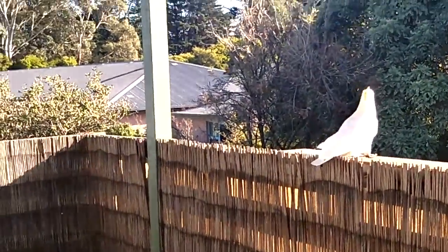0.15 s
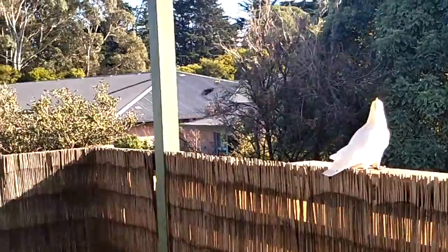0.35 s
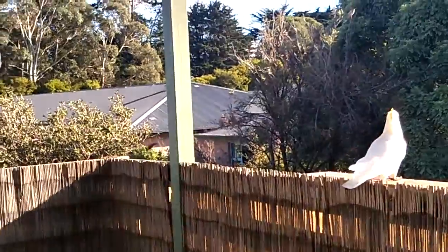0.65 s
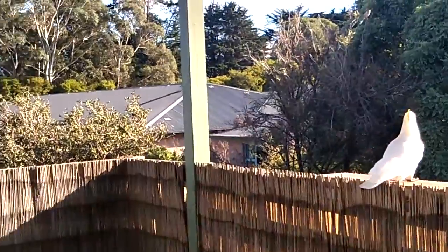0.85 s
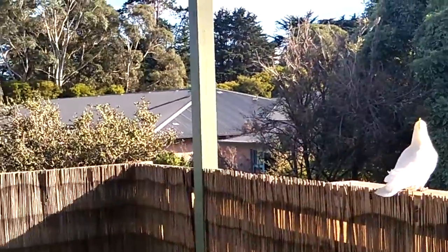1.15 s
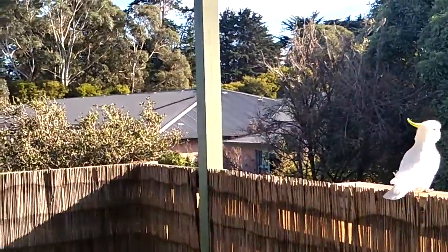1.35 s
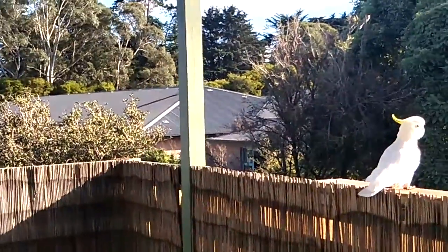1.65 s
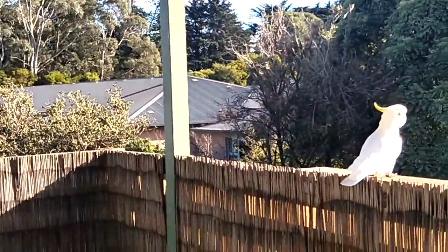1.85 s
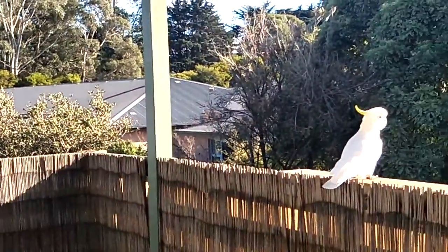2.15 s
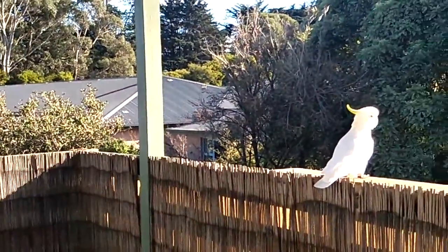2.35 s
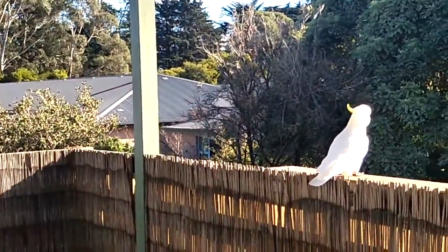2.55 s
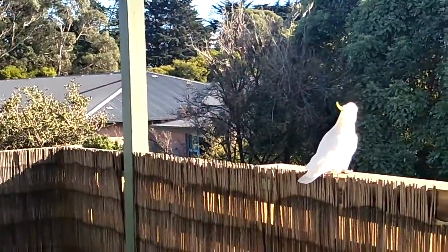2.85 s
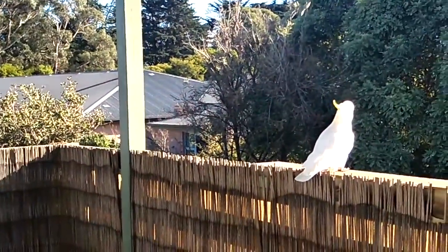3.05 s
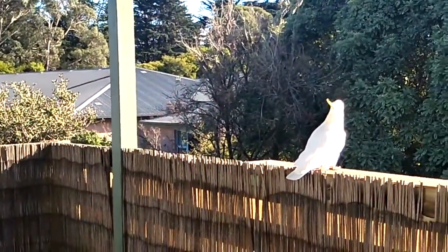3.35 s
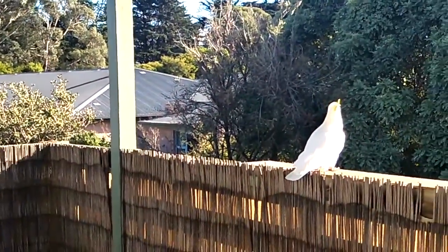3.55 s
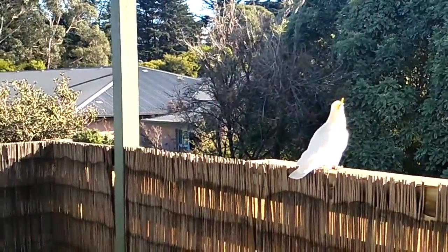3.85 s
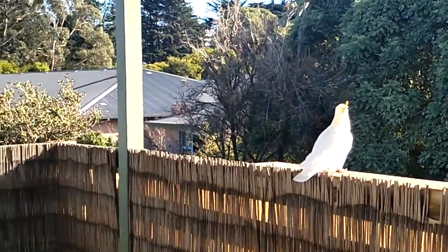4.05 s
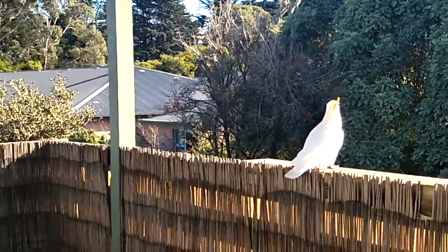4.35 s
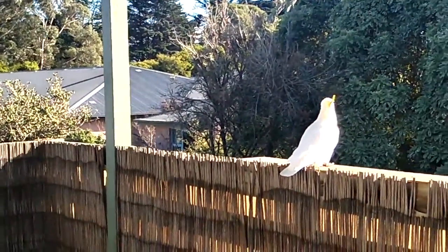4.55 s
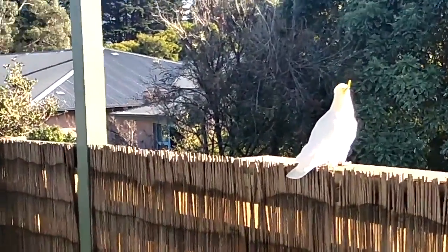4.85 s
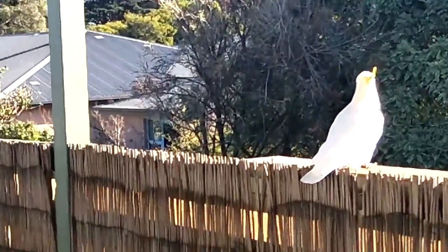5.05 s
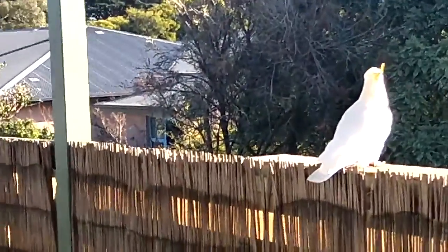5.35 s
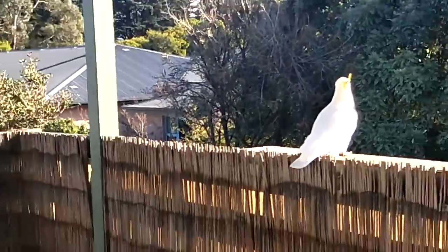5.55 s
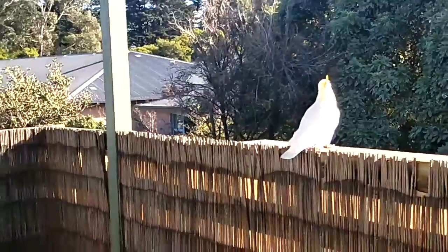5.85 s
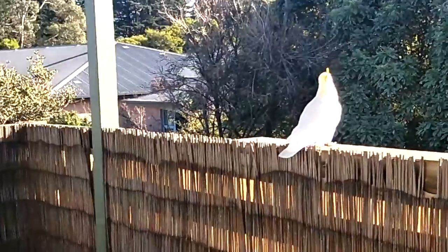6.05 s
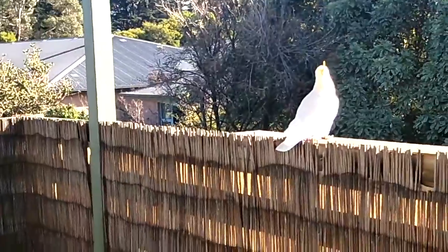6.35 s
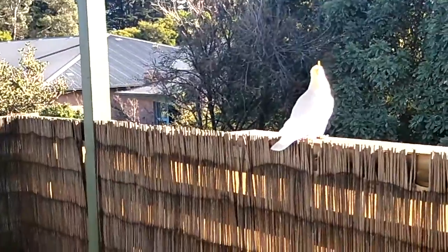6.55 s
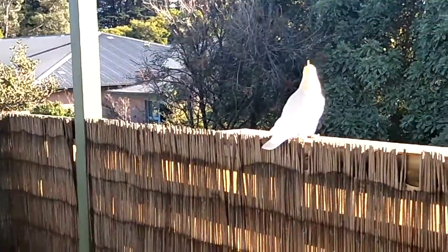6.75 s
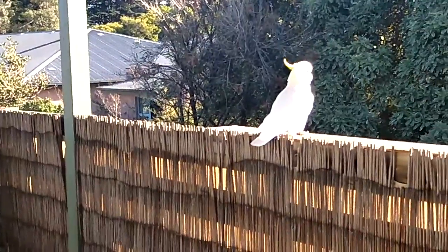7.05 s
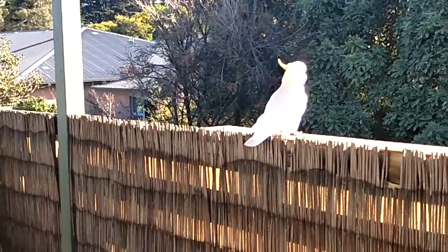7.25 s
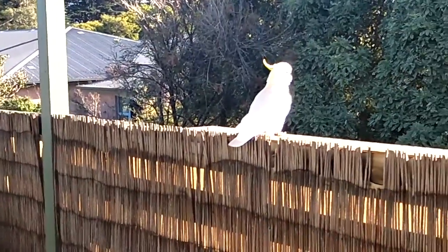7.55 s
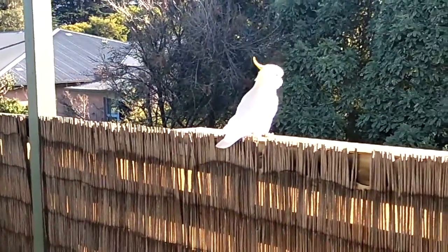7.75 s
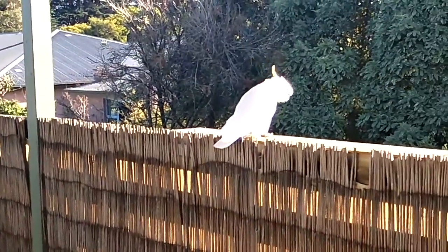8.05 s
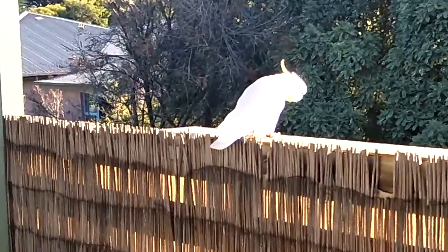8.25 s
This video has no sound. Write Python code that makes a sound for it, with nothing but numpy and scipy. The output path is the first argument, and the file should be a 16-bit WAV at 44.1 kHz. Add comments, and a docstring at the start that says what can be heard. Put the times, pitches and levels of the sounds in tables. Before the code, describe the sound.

Wingbeats and gusts of air thump close by as a cockatoo flies off screeching, leaving faint bird whistles in a suburban yard.

```python
"""A parrot flaps off past a hand-held microphone pair in a backyard, over the hush of the suburb.
Its feathers clap and its turbulent draught buffets both ports. It screeches again and again through
three throat resonances, calmer with distance, and fences and roofs reflect the calls. A few low hoots
sound far off; then distant parrots answer with thin whistles, joined by a higher, piping bird."""
import sys
import numpy as np
from scipy import signal
from scipy.fft import rfft, irfft
from scipy.io import wavfile
from scipy.ndimage import uniform_filter1d

SR = 44100
rng = np.random.default_rng(int(sys.argv[2]) if len(sys.argv) > 2 else 0)


def materialize(psi):
    """Save the field psi as 16-bit PCM at rate SR to the path in sys.argv[1].

    A 1-D psi becomes a single channel; in a 2-D psi each row is a channel.
    """
    bounded = np.clip(np.atleast_2d(psi).T, -1, 1)
    quanta = np.round(bounded * 32767).astype(np.int16)
    wavfile.write(sys.argv[1], SR, quanta)


N = 370440


def gain_of(db):
    """Decibels to amplitude."""
    return 10 ** (np.asarray(db) / 20)


def evened(x):
    """Normalisation to rms 1."""
    return x / np.sqrt(np.mean(x ** 2) + 1e-20)


def read(points, hz):
    """Interpolation on a log-frequency axis."""
    f, value = np.transpose(points)
    return np.interp(np.log(hz + 1), np.log(f + 1), value)


def add(mix, start_s, sound):
    """Superposition of a sound on the mix."""
    part = mix[..., max(round(start_s * SR), 0):][..., :sound.shape[-1]]
    part += sound[..., :part.shape[-1]]


def coloured(points, size, tilt_db=0.):
    """Spectrally shaped noise of rms 1, tilted by tilt_db per octave about 5 kHz."""
    hz = np.fft.rfftfreq(size, 1 / SR)
    shape = gain_of(read(points, hz) + tilt_db * np.log2((hz + 1) / 5000))
    return evened(irfft(rfft(rng.standard_normal(size)) * shape, size))


def wobble(size, hz):
    """Random modulation of rms 1 that changes about hz times a second."""
    span = max(round(SR / hz / 2), 1)
    return evened(uniform_filter1d(uniform_filter1d(rng.standard_normal(size), span), span))


def resonate(x, hz, width_hz):
    """A moving resonance by heterodyning: shift hz down to zero, smooth twice, shift back."""
    turn, r = np.exp(2j * np.pi * np.cumsum(hz) / SR), np.exp(-np.pi * width_hz / SR)
    low = signal.lfilter([1 - r], [1, -r], signal.lfilter([1 - r], [1, -r], x / turn))
    return 2 * (turn * low).real


def jittered_phase(hz, depth, rate_hz):
    """Phase as the integral of a randomly modulated frequency."""
    return 2 * np.pi * np.cumsum(hz * (1 + depth * wobble(len(hz), rate_hz))) / SR


def panned(x, pan_db):
    """Level difference between the ports: pan_db is left minus right."""
    return x * gain_of([[pan_db / 2], [-pan_db / 2]])


def contour(length_s, first_hz, peak_hz, last_hz, peak):
    """Progress 0-1 and pitch of a note that bends at its peak."""
    share = np.linspace(0, 1, round(length_s * SR))
    return share, np.interp(share, [0, np.clip(peak, .02, .98), 1], [first_hz, peak_hz, last_hz])


def arch(share, peak, start_db=-17, end_db=-14):
    """Parabolic swell and decay of a note, in dB."""
    from_peak = np.interp(share, [0, np.clip(peak, .02, .98), 1], [-1, 0, 1])
    return from_peak ** 2 * np.where(share < peak, start_db, end_db)


def eddy(edge_db, period_ms):
    """A passing vortex: a pressure pulse between two suctions, its front breaking into ripples."""
    t = np.arange(-1500, 1500) / SR

    def pulse(hz, lead_s=0):
        square = (np.pi * hz * (t + lead_s)) ** 2
        return (1 - 2 * square) * np.exp(-square)

    hz, spread = 1000 / period_ms, 1.1 ** rng.standard_normal()
    body = pulse(hz) + .13 * pulse(55 * spread)
    edge = pulse(2.67 * hz * spread, .003) + .12 * pulse(300 * spread, -.0011)
    return np.hanning(len(t)) * (body + gain_of(edge_db + 1) * edge)


def draught(small_eddies=70):
    """Turbulence: low pressure fluctuations, uncorrelated at the ports, with single eddies on top."""
    # strength of the flow: time_s, left_db, right_db, extra_flutter_db
    flow = [(0, -45, -45, 3), (.07, -34, -54, 6.5), (.14, -27.5, -28.5, -3), (.21, -28.5, -35, 7),
            (.28, -24.5, -41, 1.5), (.35, -19, -34, -6), (.42, -21, -27.5, 0.5), (.49, -28, -34.5, -5),
            (.58, -40.5, -39.5, -6.5), (.7, -19.5, -28, -6), (.77, -34, -41.5, 6), (.84, -46, -36, -5),
            (.91, -25.5, -34.5, 4), (1.05, -39, -41.5, 7), (1.12, -31.5, -49, 9.5), (1.19, -29.5, -43, 2),
            (1.33, -40.5, -52, -10.5), (1.47, -52.5, -83, -6.5), (1.539, -32, -52, 3),
            (1.61, -47, -42, -13), (1.68, -50, -46.5, -8), (1.82, -66.5, -65.5, -1), (1.96, -71.5, -75, -5),
            (2.1, -76, -52, -18), (2.24, -77.5, -71.5, -10.5), (2.45, -87, -83, -1.5)]
    # big eddies: time_s, level_db, side (1 left, -1 right), relative_edge_db, period_ms
    eddies = [(.049, -17.5, 1, -42, 5.8), (.088, -16.5, -1, -26, 5.5), (.142, -10, -1, -20.5, 5.9),
              (.16, -10, 1, -9, 7.2), (.214, -21.5, 1, -21, 9.6), (.251, -15.5, -1, -38, 21),
              (.268, -23, -1, -28, 5.7), (.326, -10.5, 1, -14, 10.7), (.362, -13, -1, -26.5, 5.6),
              (.4, -19.5, 1, -12, 7.6), (.419, -10.5, 1, -30, 17), (.461, -20, 1, -8, 9),
              (.513, -18, -1, -36, 11.6), (.621, -17.5, 1, -9, 7.5), (.707, -8.5, 1, -5.5, 6.56),
              (.737, -18.5, 1, -14, 8.7), (.801, -11.5, -1, -25.5, 6.3), (.931, -15, 1, -2, 8),
              (.955, -14, 1, -14.5, 4.5), (1.028, -27, 1, -4, 8.6), (1.041, -24.5, 1, 1, 7.9),
              (1.093, -14.5, 1, 0.5, 7.34), (1.15, -28, 1, -26, 6.6), (1.164, -21, 1, -15.5, 6.7),
              (1.219, -36, 1, -5, 6.2), (1.237, -17.5, 1, -11.5, 14.8), (1.514, -24.5, 1, -12, 7)]
    # spectrum of the slow turbulence: frequency_hz, density_db
    rumble_spectrum = [(8, -5.5), (20, -3.5), (38, 1.5), (70, -5), (110, -9.5), (170, -25.5), (400, -78.5)]
    # spectrum of the fast turbulence: frequency_hz, density_db
    flutter_spectrum = [(40, -49.5), (70, -27), (120, 3.5), (250, -6.5), (450, -20), (800, -38.5),
                        (1600, -94)]
    times, *strength_db, extra_db = np.transpose(flow)
    size, out = round(times[-1] * SR), np.zeros((2, N))
    t = np.arange(size) / SR
    for port in range(2):
        db = np.interp(t, times, strength_db[port])
        flutter_db = db + np.interp(t, times, extra_db) - 11.5
        rumble = coloured(rumble_spectrum, size) * gain_of(db + 3.5 + .61 * wobble(size, 31))
        flutter = coloured(flutter_spectrum, size) * gain_of(flutter_db + 5.1 * wobble(size, 40))
        add(out[port], 0, rumble + flutter)
    small = []
    for k, s in enumerate(rng.uniform(.04, times[-1] - .1, small_eddies)):
        db = np.interp(s, times, strength_db[k % 2]) - 1
        small.append((s, db, (-1) ** k, -19, 9 * 1.5 ** rng.standard_normal()))
    for s, db, side, edge_db, period_ms in eddies + small:
        burst = gain_of(db) * eddy(edge_db, period_ms)
        add(out[int(side < 0)], s - len(burst) / 2 / SR, burst)
    return out


def formant(hz, width_hz):
    """One throat resonance: band-limited noise and an unsteady tone that swell together."""
    size = len(hz)
    air = evened(resonate(resonate(rng.standard_normal(size), hz, width_hz), hz, 2 * width_hz))
    phase = jittered_phase(hz, depth=.026, rate_hz=45)
    tone = .88 * gain_of(3.6 * wobble(size, 60)) * np.sin(phase)
    return (air + tone) * gain_of(4 * wobble(size, 27))


def screeches(near_until_s=2.4, far_width=.62):
    """Source and filter: a broken, throbbing voice on three formants that shift together."""
    # calls: start_s, rise_s, hold_s, fall_s, effort_db, middle_formant_hz, climb_share,
    # low_formant_db, high_formant_db, rasp_db, breath_re_high_db, pan_db
    calls = [(0, 0.0027, .04, .05, -57.5, 4200, 0.016, -17, 0, -13.5, 6, -1.5),
             (0.397, .035, .05, 0.067, -37.5, 3927, 0.056, -7.5, 3.5, -18.5, -8.5, -3),
             (0.838, 0.017, 0.062, 0.075, -41.5, 3888, .03, -5.5, 4.5, -25, -9.5, -3.5),
             (1.415, 0.049, 0.034, 0.054, -34.5, 3980, 0.051, -6, 4, -21, -6.5, -0.5),
             (1.816, 0.032, 0.067, 0.051, -36.5, 3970, 0.059, -6, 1, -23, -9.5, -2),
             (2.139, 0.047, 0.064, 0.051, -41, 3853, .06, -6, 2, -28, -9.5, -3),
             (2.455, 0.073, .09, 0.12, -46.5, 3842, 0.031, -8, -3.5, -23, -4.5, -4),
             (2.761, .06, 0.093, 0.096, -44, 3824, .015, -6, -5, -19.5, -1.5, -3),
             (3.058, 0.058, 0.077, 0.1, -48, 3827, .03, -2.5, -5.5, -18, 0, -2),
             (3.601, 0.056, 0.061, 0.044, -51, 3650, .015, -6.5, -4, -20, 0, -4.5),
             (3.716, .05, 0.034, 0.062, -58, 3700, 0.02, -1, 6, -21, -5, -7.5),
             (3.86, 0.069, .06, 0.053, -78.5, 3910, .015, -10, 13.5, -11.5, -6.5, -13.5),
             (4.4, .02, .04, 0.041, -58, 4290, .03, -22.5, -15, -12.5, -8, -4.5),
             (4.509, 0.014, .01, 0.062, -58, 4170, 0.022, -28, -28, -8, -10, -1.5),
             (6.237, 0.049, .03, 0.025, -71, 3580, -0.02, 3, 5, -14, -11.5, -3)]
    # throat resonances at rest: centre_hz, width_hz
    throat = [(2640, 950), (3900, 1300), (5250, 1290)]
    # breath around the resonances: frequency_hz, density_db
    breath_spectrum = [(900, -35.5), (1900, -16), (2500, -13.5), (3150, -14), (3800, -11), (4450, -16.5),
                       (5000, 0.5), (6000, -4.5), (6500, -9), (7000, -63.5)]
    # treble edge of the voice: frequency_hz, density_db
    rasp_spectrum = [(6600, -60.5), (7500, -0.5), (8800, -1), (10000, -8), (12500, -18.5), (15500, -50)]
    sag_shares, out = (.07, .005, .005), np.zeros((2, N))
    for s, rise, hold, fall, db, mid_hz, climb, low_db, high_db, rasp_db, breath_db, pan_db in calls:
        t = np.arange(0, rise + hold + fall, 1 / SR)
        size, from_middle = len(t), t / t[-1] - .5
        stages_s = np.cumsum([0, rise, hold, fall])
        db += np.interp(t, stages_s, [-20, -4, -6, -21.5])
        low_db += np.interp(t, stages_s, [5, 0, -2.76, -13.5])
        high_db += np.interp(t, stages_s, [-5, 0, 4, -7])
        rasp_db += np.interp(t, stages_s, [-12, 0, 1, 4.5])
        throb = gain_of(2.5 * wobble(size, 150))
        beak_opening = 1 - .06 * np.exp(-t / .03)
        shift = mid_hz / throat[1][0] * (1 + climb * from_middle) * beak_opening
        shift *= 1 + .012 * wobble(size, 25)
        narrowing = far_width if s > near_until_s else 1  # later calls are calmer
        ports = []
        for port in range(2):  # near reflections make the two ports unlike
            low, mid, high = (formant(hz * (1 - sag * from_middle) * shift, width_hz * narrowing)
                              for (hz, width_hz), sag in zip(throat, sag_shares))
            breath = coloured(breath_spectrum, size) * gain_of(high_db + breath_db)
            rasp = coloured(rasp_spectrum, size) * gain_of(rasp_db + 3.5 * wobble(size, 220))
            ports.append(low * gain_of(low_db) + mid + high * gain_of(high_db) + breath + rasp)
        envelope = throb * gain_of(db) * signal.windows.tukey(size, .35)
        add(out, s, panned(np.array(ports) * envelope, pan_db))
    return out


def hush(level_db=-66):
    """Partial coherence: far traffic and leaves, correlated at the ports in the bass, not the treble."""
    # background noise: frequency_hz, density_db
    spectrum = [(12, -7), (25, -1.5), (45, 0.5), (90, -3.5), (200, -8), (320, -12), (580, -14.5),
                (750, -12.5), (1200, -16), (3400, -18), (7000, -18.5), (10000, -25), (13500, -23),
                (15600, -25.5)]
    # likeness of the two ports: frequency_hz, correlation
    coherence = [(60, -0.61), (180, 1), (550, 0.022), (1650, -0.14), (4970, 0.048), (15000, -0.07)]
    frames, hz = N // 256 + 5, np.fft.rfftfreq(1024, 1 / SR)
    a, b, c, d, patches = rng.standard_normal((frames, 513, 5)).T
    patches = evened(uniform_filter1d(uniform_filter1d(patches, 10, 0), 14, 1))
    correlation = np.clip(read(coherence, hz), -1, 1)[:, None]
    left = a + 1j * b
    right = correlation * left + np.sqrt(1 - correlation ** 2) * (c + 1j * d)
    bands = np.array([left, right]) * gain_of(read(spectrum, hz)[:, None] + 2.2 * patches)
    return gain_of(level_db) * evened(signal.istft(bands, nperseg=1024, noverlap=768)[1][:, :N])


def yard(x, far_db=-23, far_longer=2.5):
    """Reverberation: sparse echoes off fences and roofs, and a slower tail from further roofs and trees."""
    # decay of the near echoes: frequency_hz, t60_s
    decay = [(1000, 0.59), (2200, 0.37), (4000, 0.34), (5800, 0.38), (8000, 0.25)]
    taps = np.zeros((2, SR))
    at = np.arange(500, SR - 20, 20) + rng.integers(0, 20, (2, (SR - 501) // 20))
    np.put_along_axis(taps, at, rng.choice([-1., 1.], at.shape), 1)
    hz, t, bands = signal.stft(taps, SR, nperseg=256)
    fade_db = -60 * t / read(decay, hz)[:, None]
    fade = gain_of(fade_db) + gain_of(far_db + fade_db / far_longer)
    tail = signal.istft(bands * fade, SR, nperseg=256)[1]
    return signal.fftconvolve(x, tail / np.linalg.norm(tail[0]), axes=1)[:, :N]


def feather_claps(attack_s=.0021):
    """Impact noise: feathers snap in grainy bursts that decay exponentially."""
    # claps: start_s, level_db, t60_s, tilt_db_per_octave, pan_db
    claps = [(0.092, -29, 0.19, 1.5, -4), (0.109, -32, 0.1, -4.5, 6), (.352, -49.5, .05, 0.5, -5.5),
             (0.577, -52.5, 0.048, 5, -18.5), (0.951, -51, 0.11, 6.5, -2), (1.247, -38.5, 0.071, -2, -1),
             (7.559, -61, 0.089, -1.5, -6.5)]
    # feather noise: frequency_hz, density_db
    spectrum = [(590, -50.5), (1000, -23), (1270, -29.5), (1880, -19.5), (2160, -24.5), (2710, -19),
                (3220, -14.5), (3650, -13.5), (5340, -2.5), (6950, -18.5), (15500, -30.5)]
    out = np.zeros((2, N))
    for s, db, t60, tilt_db, pan_db in claps:
        t = np.arange(round(t60 * SR)) / SR
        grain = gain_of(2.8 * wobble(len(t), 300))
        burst = np.array([coloured(spectrum, len(t), tilt_db) for port in range(2)])
        envelope = gain_of(db - 60 * t / t60) * np.minimum(t / attack_s, 1)
        add(out, s, panned(burst * grain * envelope, pan_db))
    return out


def whistles(squabble_s=(3.3, 5.6), port_lag_s=.00045):
    """Random modulation roughens a tone of three harmonics; the lower two reach the right port first."""
    # notes, the first five leading into the near screeches: start_s, length_s, first_hz, peak_hz,
    # last_hz, level_db, peak_share, octave_db, octave_peak_share, pan_db
    notes = [(0.365, 0.041, 1865, 1952, 1883, -55.5, 0.9, -66, .85, 3),
             (0.805, 0.04, 1900, 1894, 1830, -60, 0.34, -64.5, 1, 11),
             (1.384, .03, 2010, 1960, 2030, -54, 1, -60, 0.84, 3),
             (1.787, 0.026, 1960, 1865, 1920, -50, 0.7, -53, 0.84, 5),
             (2.122, 0.031, 1940, 1890, 1870, -55, 0.5, -55.5, 0.96, 9),
             (2.68, 0.12, 3230, 3150, 3170, -62.5, 0.4, -80, .45, -13),
             (3.374, 0.023, 3370, 3550, 3460, -49, 0.6, -84, .45, -8),
             (3.397, 0.044, 3550, 3180, 3080, -49.5, 0.43, -86, .7, 8.5),
             (3.456, 0.091, 2315, 2540, 2880, -62.5, 0.16, -45, 1, 2),
             (3.544, 0.17, 2853, 2850, 3180, -54.5, 0.26, -41, 0.22, 4),
             (4.397, 0.069, 3070, 3100, 3430, -65.5, 0.06, -68.5, .15, -10.5),
             (4.465, 0.064, 3140, 3280, 2875, -57.5, 0.1, -55, 0.73, -2),
             (4.533, .045, 3030, 2960, 3090, -66, .22, -53.5, 0.27, 0),
             (5.285, 0.031, 2870, 2930, 2950, -70, 0.46, -55.5, .28, 2.5),
             (5.35, 0.036, 3160, 3000, 3000, -66, 0.55, -61.5, 0.86, 6),
             (5.406, 0.094, 3050, 3080, 3070, -64.5, 0.24, -73, .65, 6),
             (6.688, .033, 3190, 3200, 3600, -65.5, .45, -98.5, .3, -13),
             (6.711, 0.056, 2540, 2470, 2710, -69, 0.22, -69, 0.3, 6),
             (6.755, 0.13, 2258, 2220, 2260, -66.5, 0.62, -58, 0.53, 5.5),
             (6.964, 0.1, 2160, 2830, 2850, -71.5, 0.72, -53.5, 0.6, -5),
             (7.065, 0.071, 2870, 2685, 2663, -69.5, 0.37, -55.5, 0.53, -7.5),
             (7.754, .03, 1860, 2600, 2550, -72.5, 0.54, -95, .6, 5),
             (7.787, 0.017, 2460, 2456, 2430, -67, .48, -74, .48, 5),
             (7.8, 0.039, 3230, 3200, 3740, -60.5, 0.66, -97.5, .45, -14),
             (7.835, 0.066, 2570, 2490, 2640, -66.5, 0.03, -60.5, 1, 0.5),
             (7.881, 0.12, 2290, 2312, 2330, -62, 0.3, -58, 0.69, -5.5)]
    out = np.zeros((2, N))
    for s, length_s, first_hz, peak_hz, last_hz, db, peak, octave_db, octave_peak, pan_db in notes:
        share, hz = contour(length_s, first_hz, peak_hz, last_hz, peak)
        db += arch(share, peak)
        octave_db += arch(share, octave_peak, start_db=-21.5, end_db=-21.5)
        glide = abs(np.gradient(np.log(hz))) * SR / 12  # fast glides are unsteady
        squabbling = squabble_s[0] < s < squabble_s[1]  # the flock turns hoarse
        rough = .088 + np.minimum(glide, .3) + .3 * squabbling
        phase = jittered_phase(hz, depth=.035 * rough, rate_hz=150)
        port_phase = np.array([phase, phase + 2 * np.pi * hz * port_lag_s])
        third_db = octave_db - 19 - np.maximum(3 * hz - 6800, 0) / 17  # the windpipe cuts off near 7 kHz
        tone = gain_of(db) * np.sin(port_phase) + gain_of(octave_db) * np.sin(2 * port_phase)
        tone += gain_of(third_db) * np.sin(3 * phase)
        envelope = gain_of(6.9 * rough * wobble(len(hz), 76)) * signal.windows.tukey(len(hz), .25)
        add(out, s, panned(np.sqrt(2) * tone * envelope, pan_db))
    return out


def voiced_onsets(settle_s=.018, onset_s=.04, break_s=.015, stagger_s=.003):
    """Vibrating folds open each near screech with a rising harmonic series that grows unsteady."""
    # onsets: start_s, length_s, first_hz, settled_hz, last_hz, fundamental_db, overtones_db
    onsets = [(0.376, 0.1112, 888, 965, 1030, -57.5, -55.5), (0.819, 0.1, 885, 995, 1005, -59, -60),
              (1.404, 0.1, 880, 990, 999, -49.5, -53.5), (1.798, .115, 875, 985, 1085, -52.5, -53.5),
              (2.135, 0.13, 860, 955, 1034, -64, -62)]
    # overtones of the folds: harmonic_number, relative_db
    overtones = [(2, -10), (3, 3), (4, 7), (5, 0), (6, -3.5), (7, -19)]
    path_phase = lambda: np.array([[0], [rng.uniform(0, 2 * np.pi)]])  # each harmonic takes its own path
    out = np.zeros((2, N))
    for s, length_s, first_hz, settled_hz, last_hz, db, upper_db in onsets:
        t = np.arange(0, length_s, 1 / SR)
        size = len(t)
        hz = settled_hz + (first_hz - settled_hz) * np.exp(-t / settle_s)
        hz += (last_hz - settled_hz) * (t / length_s) ** 3
        strain = np.linspace(.2, 1, size)
        phase = jittered_phase(hz, depth=.018 * strain, rate_hz=110)
        upper = np.zeros((2, size))
        for k, relative_db in overtones:
            entry = np.clip(t / (stagger_s * (k - 1)), 0, 1) ** 2  # higher overtones join later
            flicker_db = 3.4 * wobble(size, 78.76)
            upper += entry * gain_of(relative_db + flicker_db) * np.sin(k * phase + path_phase())
        breath = evened(resonate(rng.standard_normal(size), hz, width_hz=160))
        fundamental = np.sin(phase + path_phase()) * (1 - .6 * strain) + .5 * strain * breath
        voice = gain_of(db + 2.9 * wobble(size, 60)) * fundamental + gain_of(upper_db + 8) * upper
        envelope_db = np.interp(t, [0, onset_s, length_s - break_s, length_s], [-11.5, 0, 0, -11])
        envelope = gain_of(envelope_db) * signal.windows.tukey(size, .15)
        add(out, s, panned(np.sqrt(2) * voice * envelope, pan_db=-.068))
    return out


def breathy_notes(notes, hoarse=.58):
    """Spectral broadening: each tone is blurred by a narrow band of breath around its pitch."""
    out = np.zeros((2, N))
    for s, length_s, first_hz, peak_hz, last_hz, db, peak, pan_db in notes:
        share, hz = contour(length_s, first_hz, peak_hz, last_hz, peak)
        size, width_hz = len(hz), .039 * hz.mean()
        tone = np.sqrt(2) * np.sin(jittered_phase(hz, depth=.0035, rate_hz=130))
        breath = np.array([evened(resonate(rng.standard_normal(size), hz, width_hz)) for port in range(2)])
        voice = (1 - hoarse) * tone + hoarse * breath
        db += arch(share, peak) + .83 * wobble(size, 58)
        add(out, s, panned(voice * gain_of(db) * signal.windows.tukey(size, .25), pan_db))
    return out


def hoots():
    """A low, breathy resonance: soft hoots far off."""
    # hoots: start_s, length_s, first_hz, peak_hz, last_hz, level_db, peak_share, pan_db
    notes = [(1.11, 0.14, 687, 682, 690, -63.5, .45, 1.6), (2.67, 0.11, 740, 746, 734, -69, 0.4, 1.7),
             (3.25, 0.086, 730, 742, 713, -70, .4, 1.5)]
    return breathy_notes(notes)


def piping():
    """A high, breathy resonance: another bird pipes near 4 kHz."""
    # pipes: start_s, length_s, first_hz, peak_hz, last_hz, level_db, peak_share, pan_db
    notes = [(4.332, 0.095, 4334, 4010, 4070, -52.5, 0.64, -16),
             (4.427, 0.095, 4360, 4360, 4320, -52, 0.1, -11.5),
             (4.509, 0.047, 4380, 4285, 4340, -43.5, 0.44, -8.5),
             (4.559, .14, 4390, 4600, 4660, -64.5, 0.3, -9.5),
             (5.262, 0.062, 4380, 4660, 4900, -62.5, 0.3, -5),
             (5.313, 0.035, 4100, 4100, 4060, -60.5, .7, -7),
             (5.383, 0.048, 4294, 4250, 4200, -59.5, .3, -6.5),
             (6.94, 0.045, 3550, 3900, 4320, -62.5, 0.43, -7.5)]
    return breathy_notes(notes)


def scene():
    """Direct and reflected sound add: the birds ring in the yard; draught and hush arrive directly."""
    claps, calls = feather_claps(), screeches()
    notes = voiced_onsets() + whistles() + piping() + hoots()
    echoes = yard(gain_of(-5) * calls + gain_of(-14) * notes + gain_of(-10) * claps)
    return calls + notes + claps + echoes + draught() + hush()


def record(dry):
    """Band limiting: the recorder passes little above its cutoff."""
    cutoff_hz = 15650
    low_pass = signal.firwin(511, cutoff_hz, window=("kaiser", 9), fs=SR)
    return signal.oaconvolve(dry, low_pass[None], "same")


dry = scene()
out = record(dry)
materialize(out)
```